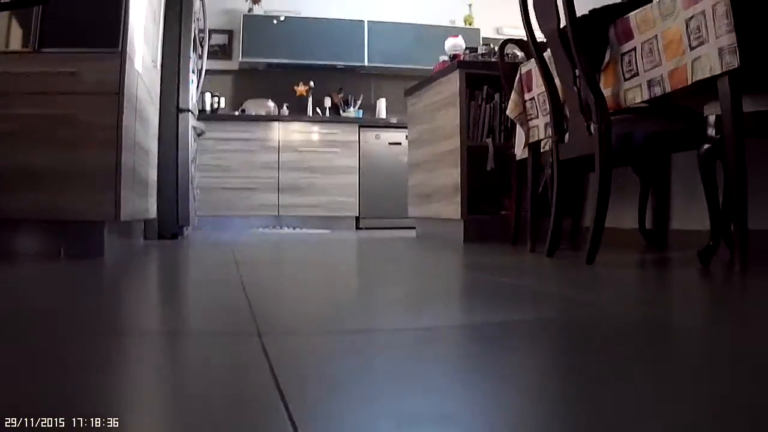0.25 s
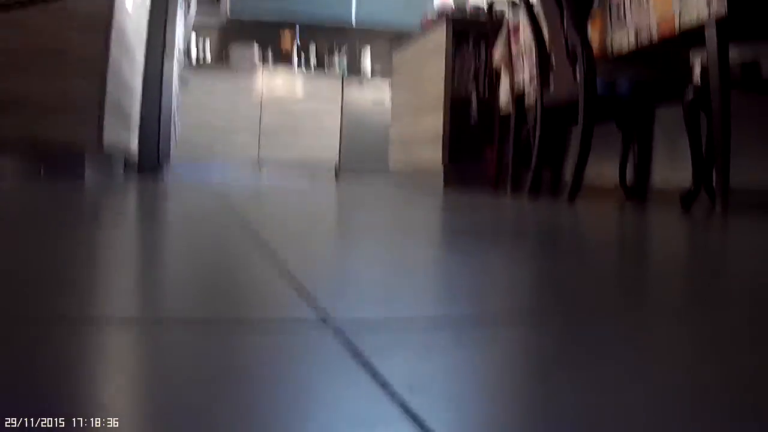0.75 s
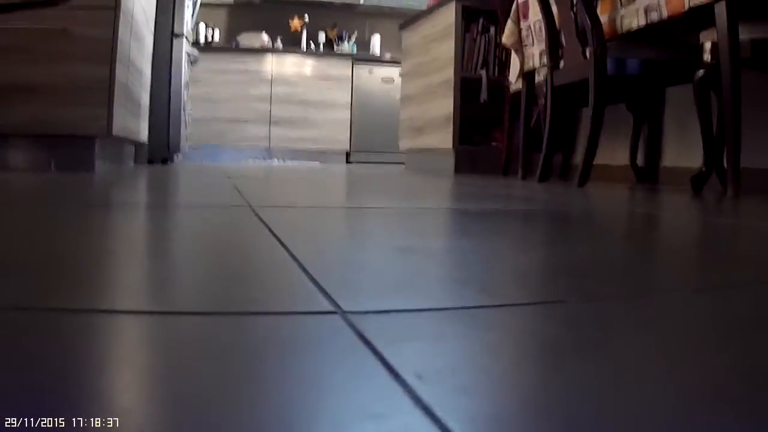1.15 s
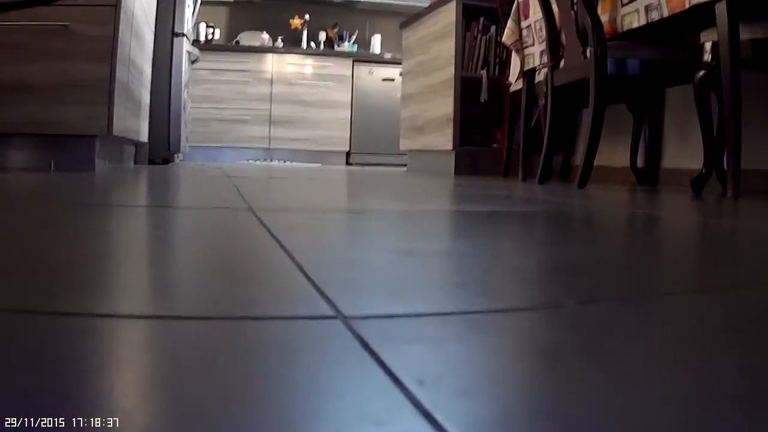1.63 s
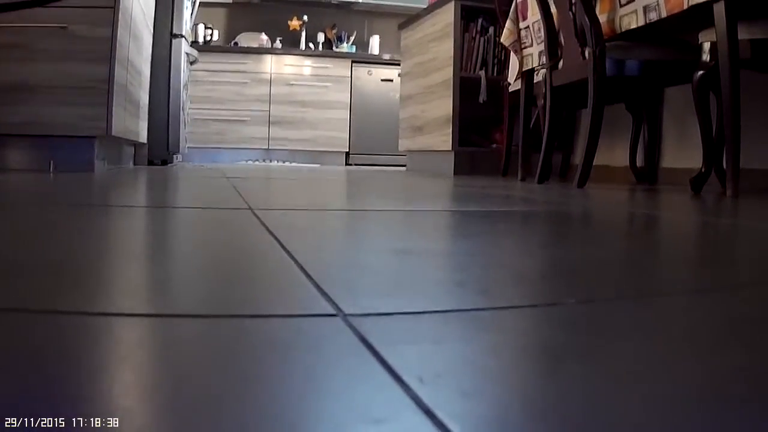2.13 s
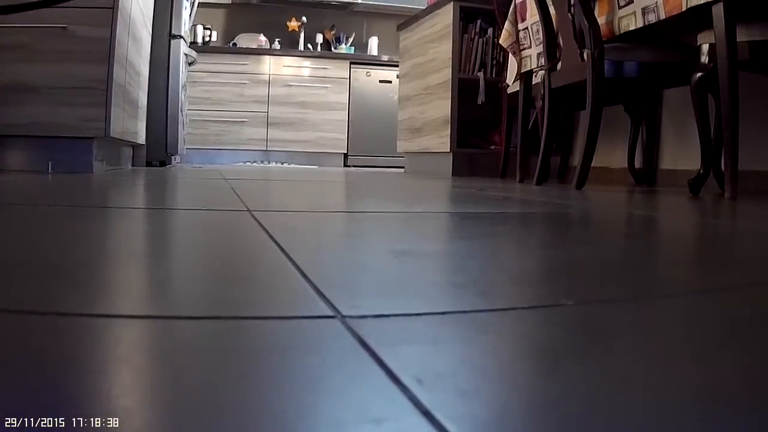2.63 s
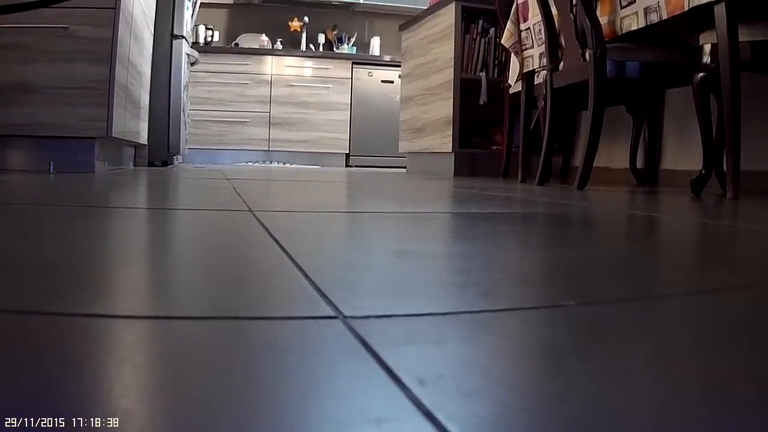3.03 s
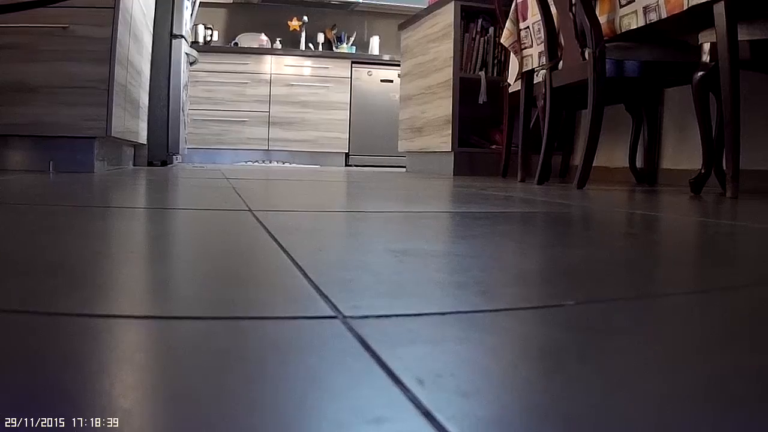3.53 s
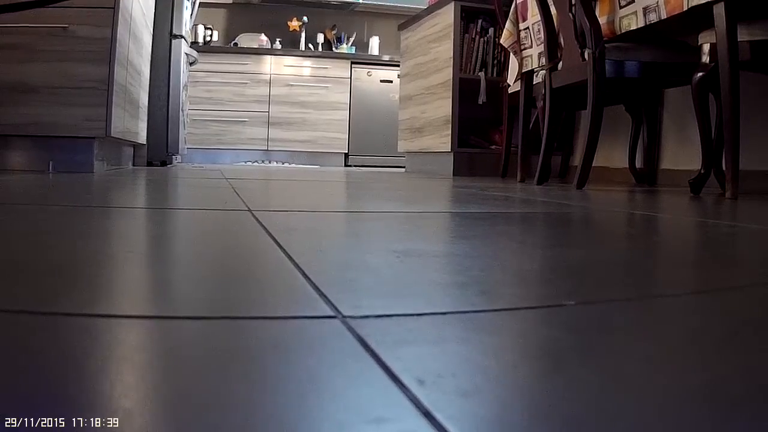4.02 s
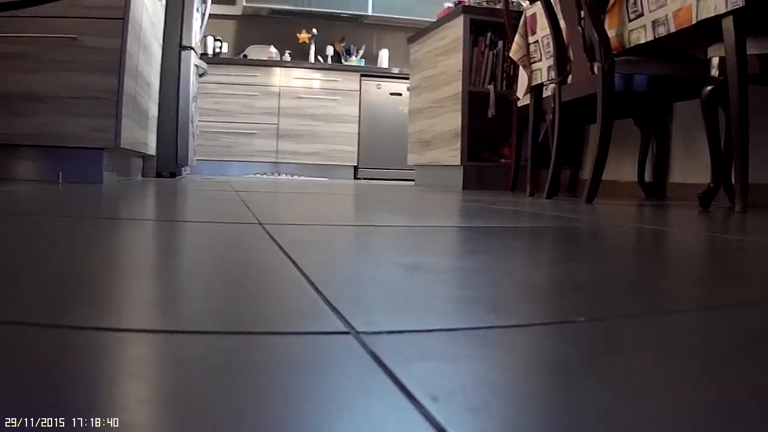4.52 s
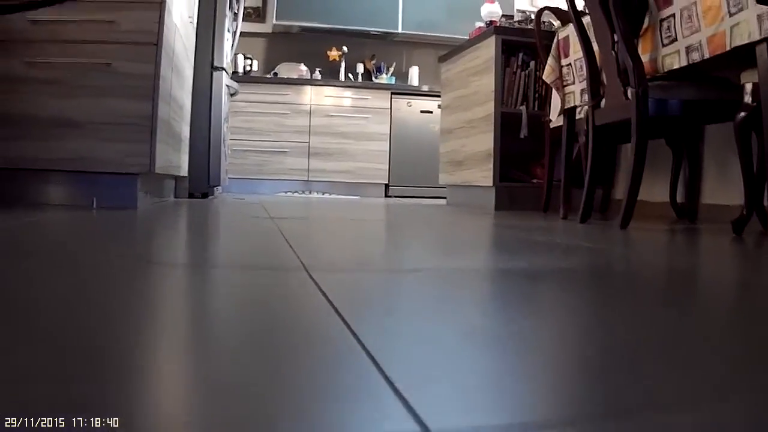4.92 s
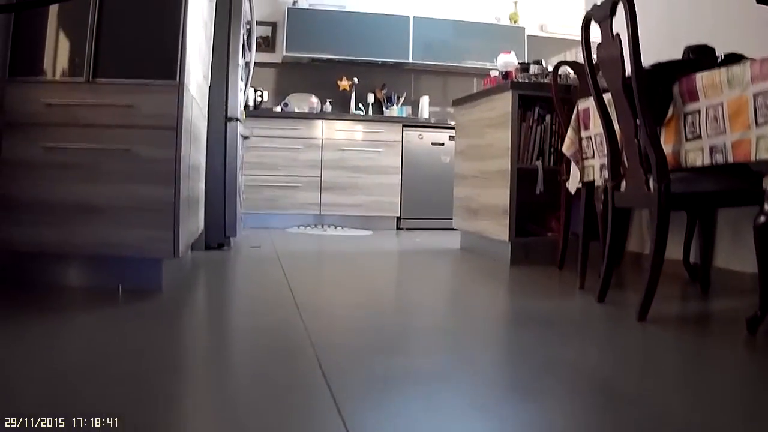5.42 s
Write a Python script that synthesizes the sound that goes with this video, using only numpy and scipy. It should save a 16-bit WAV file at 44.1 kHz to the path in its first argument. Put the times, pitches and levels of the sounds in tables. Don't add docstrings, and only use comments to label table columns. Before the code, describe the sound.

Plastic legs knock on tile, a long quiet follows with one distant snap, then four tiny motors whistle, rev up and scream.

```python
import sys
import numpy as np
from scipy import signal
from scipy.fft import rfft, irfft, next_fast_len
from scipy.io import wavfile
from scipy.ndimage import uniform_filter1d

SR = 44100
rng = np.random.default_rng(int(sys.argv[2]) if len(sys.argv) > 2 else 0)


def ratio(d):
    e = np.asarray(d, float) / 20
    return 10 ** e


def wav_record(signal):
    frames = np.transpose(np.atleast_2d(signal))
    bounded = np.clip(frames, -1, 1)
    quanta = np.round(bounded * 32767).astype(np.int16)
    wavfile.write(sys.argv[1], SR, quanta)


N = 249606

POWER_ON_S = 3.882
GEAR_RATIO = 5.42

# (time [s], shaft speed [Hz])
SHAFT_SPEEDS = [
    [(3.88, 10), (4.0, 131), (4.25, 332), (4.45, 461), (4.62, 528), (4.85, 555), (5.2, 564.5),
     (5.47, 537.5), (5.66, 540.7)],
    [(3.88, 10), (4.0, 155), (4.3, 374), (4.58, 522), (4.73, 564), (4.88, 571.5), (5.03, 561.5),
     (5.26, 567.5), (5.46, 556.5)],
    [(3.88, 12), (4.0, 185), (4.12, 286), (4.4, 456), (4.65, 576), (4.85, 645), (5.02, 669), (5.22, 669),
     (5.66, 633)],
    [(3.88, 12), (4.0, 176), (4.3, 395), (4.6, 571), (4.8, 631), (4.95, 661), (5.1, 664), (5.29, 662),
     (5.66, 628)],
]
# (unbalance [dB], commutator [dB], its octave [dB], gear mesh [dB])
STRONG_ORDERS = [(-33, -19.5, -20.5, -36.5), (-40.5, -19, -19.5, -26), (-26, -24.5, -26, -25.5),
                 (-27.5, -22.5, -23.5, -28.5)]
WEAK_MULTIPLES = [4, 7, 8, 10, 12]
# (level of each multiple [dB], ...)
WEAK_ORDERS = [(-18, -20, -20, -30, -24), (-24, -18, -20, -11, -26), (-18, -17, -11, -15, -24),
               (-22, -22, -17, -24, -24)]
ROTOR_UNBALANCE = [-33.5, -57, -36, -53]
# (frequency [Hz], width [Hz], level [dB])
FRAME_MODES = [(740, 150, 7), (1780, 680, 9.5), (3990, 720, 1.5), (4960, 680, 1.5), (6550, 1300, -6.5),
               (10200, 4300, -29)]
# (frequency [Hz], level [dB])
ARM_RESPONSES = [
    [(400, -23.5), (780, -1.5), (1030, -10), (1350, -3), (1700, -0.5), (2000, -0.5)],
    [(1000, -16.5), (1400, -7.5), (1720, 2.5), (2200, -9), (2900, -11.5), (3400, -25.5), (4000, -6)],
    [(1300, -14), (1800, 6), (2300, 7.5), (2900, -12), (3700, -11), (4300, 0), (5100, 2.5), (6000, -6.5)],
]
# (time [s], level [dB])
WHISTLE_LEVEL = [(3.882, -58), (3.885, -34.5), (3.9, -33.5), (4, -22), (4.3, -27), (4.48, -26.5),
                 (4.7, -38.5), (5.3, -40.5), (5.66, -41)]
WHISTLE_OVERTONES = [-2.5, -13.5, -22]
# (time [s], level [dB])
BRUSH_STRAIN = [(3.88, -53), (3.914, -21.5), (3.968, -7.5), (4.044, -1), (4.19, -1), (4.34, -0.5),
                (4.52, -1.5), (4.74, -5), (5.66, -5.5)]
# (frequency [Hz], density [dB per Hz])
DRUM_SPECTRUM = [(300, -55), (500, -9.5), (780, 2), (1100, -5.5), (1450, 2), (1850, 6.5), (2300, -3.5),
                 (3000, -77)]
# (frequency [Hz], density [dB per Hz])
RATTLE_SPECTRUM = [(1500, -24), (2300, -5.5), (3000, -5.5), (4000, 0), (4600, -6.5), (5200, 0), (6000, -4),
                   (7000, -3), (9000, -29)]
# (frequency [Hz], density [dB per Hz])
BRUSH_HISS_SPECTRUM = [(4500, -20.5), (6300, -16), (7800, 1.5), (9100, -6.5), (10200, 1), (11000, -5),
                       (11800, -13.5), (14000, -19.5), (15300, -25), (15800, -54)]
# (frequency [Hz], density [dB per Hz])
WASH_SPECTRUM = [(10, -5), (40, -1), (75, -6), (105, 9), (140, -8), (250, -7), (400, -11), (700, -16)]
# (time [s], body level [dB], snap level [dB], body pitch [Hz])
CONTACTS = [(0.5857, -50, -20, 1660), (0.6794, -19.5, -5.5, 1250), (0.6884, -18, -4.5, 1350),
            (0.7479, -19, -4, 1460), (0.7969, -23, -6, 910), (0.814, -42, -14, 1410),
            (0.829, -41, -3, 1800), (0.845, -46, -3, 1800), (.9894, -50, 0, 2290), (1.8668, -50, -22, 1520),
            (2.7978, -53.5, -6, 1230), (3.8221, -43, -2, 1070), (3.8814, -34.5, -4, 1900)]
# (time [s], level [dB])
SETTLING_TICKS = [(0.959, -59), (1.099, -63), (1.117, -64), (1.9064, -59.5), (1.932, -57), (2.015, -58.5),
                  (2.909, -64), (2.945, -61), (3.5094, -65), (3.5862, -62), (3.636, -59.5)]
# (time [s], level [dB], pitch [Hz], t60 [s])
SOFT_BUMPS = [
    (1.866, -50.5, 520, 0.14),
    (1.961, -53.5, 320, 0.2),
    (2.797, -54, 620, .08),
    (3.886, -49, 103, 0.78),
]
# (time [s], level [dB], pitch [Hz], t60 [s], stopped at [s])
SHELL_RINGS = [
    (.688, -17, 652, 0.26, 0.79),
    (.757, -20, 615, 0.069, 1),
    (.803, -27, 640, 0.14, .9),
    (.92, -45, 653, 0.17, 0.99),
]
# (time [s], level [dB], length [s])
LEG_SLIDES = [
    (0.683, -40, 0.021),
    (0.745, -37.5, 0.032),
    (0.8, -40.5, 0.037),
    (0.895, -57.5, 0.14),
]
# (frequency [Hz], density [dB per Hz])
FRICTION_SPECTRUM = [(60, -38), (150, -11), (600, -7), (1000, -8.5), (1800, -9), (2600, -23), (6200, -23.5),
                     (10000, -26.5), (15000, -40)]
# time [s], direct level [dB], reverberation level [dB]
DISTANT_KNOCK = (3.083, -32, -45)
# (frequency [Hz], density [dB per Hz])
DISTANT_SPECTRUM = [(200, -45), (450, -18), (700, -7), (920, -2), (1200, -6), (1520, 0), (1900, -12),
                    (2600, -17), (3600, -14), (5200, -19), (8000, -27), (13000, -45)]
# (frequency [Hz], t60 [s])
KITCHEN_T60 = [(500, .45), (1500, .6), (4000, .5), (10000, .4)]
# (frequency [Hz], density [dB per Hz])
MURMUR_SPECTRUM = [(60, -12.5), (110, -1), (190, 2.5), (350, -4.5), (600, -7), (850, -11), (1250, -6),
                   (1750, -10.5), (2100, -18), (3000, -31), (5000, -61)]
# (time [s], level [dB])
MURMUR_SWELL = [(0, 2), (.85, 1.5), (1.1, 4), (1.6, 0.5), (2, 4), (2.5, 0), (2.95, 1.5), (3.55, -4),
                (3.87, 3.5)]
# (frequency [Hz], density [dB per Hz])
SELF_NOISE_SPECTRUM = [(800, 6.5), (2500, -4), (4000, 0), (6000, -4), (8000, -2.5), (10000, -2.5),
                       (13000, -5.5), (15500, -7)]
# (frequency [Hz], density [dB per Hz])
RUMBLE_SPECTRUM = [(6, -20), (12, -18), (17, -4), (21, 0), (26, -7), (32, -19), (40, -24), (60, -20),
                   (110, -28), (200, -60), (400, -120)]
# (time [s], level [dB])
RUMBLE_LEVEL = [(0, -60), (.6, -62), (.85, -52), (1.2, -56), (1.85, -56), (2.3, -63), (2.7, -57),
                (3.87, -63.5)]


def unit(x):
    return x / np.sqrt(np.mean(x ** 2) + 1e-20)


def curves(rows):
    s, *cols = np.transpose(rows)
    return [np.interp(np.arange(N) / SR, s, c) for c in cols]


def smooth_curves(rows):
    s, *cols = np.transpose(rows)
    place = np.interp(np.arange(N) / SR, s, np.arange(len(s)))
    i = np.minimum(place.astype(int), len(s) - 2)
    u, step = place - i, np.diff(s)[i]

    def arc(v, slope):
        blend = v[i] + u * u * (3 - 2 * u) * (v[i + 1] - v[i])
        return blend + step * u * (1 - u) * ((1 - u) * slope[i] - u * slope[i + 1])

    return [arc(c, np.gradient(c, s)) for c in cols]


def along(points, hz):
    f, v = np.transpose(points)
    return np.interp(np.log(hz + 1), np.log(f + 1), v)


def wobble(rate):
    knots = np.arange(int(N * rate / SR) + 2)
    return np.interp(np.arange(N) * rate / SR, knots, rng.standard_normal(len(knots)))


def coloured(x, spectrum):
    m = next_fast_len(len(x) + 8192)
    closed = list(spectrum) + [(spectrum[-1][0] * 3, -100)]
    gain = ratio(along(closed, np.fft.rfftfreq(m, 1 / SR)))
    return unit(irfft(rfft(x, m) * gain, m)[:len(x)])


def noise(spectrum, length=N):
    return coloured(rng.standard_normal(length), spectrum)


def drone():
    t = np.arange(N) / SR
    speeds = [smooth_curves(rows)[0] for rows in SHAFT_SPEEDS]
    cancel_db = -22 * np.exp(-((t - 5.11) / 0.046) ** 2)
    merged = (1 + np.tanh((t - 4.86) / 0.023)) / 2
    masked_db = [cancel_db / 2, cancel_db, 0, -38 * merged]
    mesh_masked_db = [0, 0, -24 * merged, 0]
    tones, commutation = zip(*map(motor, speeds, STRONG_ORDERS, masked_db, mesh_masked_db,
                                  WEAK_ORDERS, ROTOR_UNBALANCE))
    speed = sum(speeds) / sum(speeds).max()
    running = sum(tones) + whistle(commutation) + brush_noise(commutation, speed) + rotor_wash(speed)
    return running * (t > POWER_ON_S)


def motor(hz, strong, masked_db, mesh_masked_db, weak, rotor_db):
    shaft_db = strong[0] + masked_db + 17 * 10 * np.log10(np.clip(hz / 446, 0, 1))
    effort = np.clip(hz / 190, 0, 1) ** 4.4
    comm, twice, mesh = (effort * ratio(db + along(arm, k * hz))
                         for k, db, arm in zip([3, 6, 9], strong[1:], ARM_RESPONSES))
    load = np.clip(uniform_filter1d(np.gradient(hz) * SR, SR // 10) / 800, 0, 1)
    flutter_hz = hz * .0011 * wobble(50) + 4.5 * load * wobble(120)
    turn = 2 * np.pi * (np.cumsum(hz + flutter_hz) / SR + rng.random())
    rotor = turn / GEAR_RATIO

    def tone(order):
        level = ratio(0.9 * wobble(30) + 1.4 * wobble(9))
        return 2 ** .5 * level * np.sin(order * turn + 2 * np.pi * rng.random())

    def wag(depth):
        return 1 + depth * np.cos(rotor)

    sound = ratio(shaft_db) * wag(0.25) * tone(1)
    sound += mesh * ratio(mesh_masked_db) * wag(0.35) * tone(9)
    sound += ratio(shaft_db - 2.0) * load * tone(1 + 1 / GEAR_RATIO)
    sound += wag(0.19) * ratio(masked_db) * (comm * tone(3) + twice * tone(6))
    sound += effort * sum(ratio(db - 20.0) * frame(k * hz) * tone(k) for k, db in zip(WEAK_MULTIPLES, weak))
    rotor_gain = ratio(rotor_db + 3.8 * wobble(18)) * np.clip(hz / (0.8 * hz.max()), 0, 1) ** 4
    sound += rotor_gain * (np.sin(rotor) + 0.19 * np.sin(2 * rotor))
    return sound, 3 * turn


def frame(hz):
    return sum(ratio(db) / (1 + (2 * (hz - c) / w) ** 2) for c, w, db in FRAME_MODES)


def whistle(commutation):
    t = np.arange(N) / SR
    whistle_db, = curves(WHISTLE_LEVEL)
    tops_db = -26 + (-5.5 + 26) * np.exp(-((t - POWER_ON_S) / 0.17) ** 2)
    broken = 1 + sum(.2 * np.cos(c) + .2 * np.cos(2 * c) for c in commutation)

    def partial(k):
        switch_hz = 3666.7
        phase = 2 * np.pi * k * switch_hz * t + .35 * k * wobble(150)
        return ratio(1.5 * wobble(60)) * np.sin(phase)

    tops = sum(ratio(db + tops_db) * partial(k) for k, db in enumerate(WHISTLE_OVERTONES, 2))
    return 2 ** .5 * ratio(whistle_db) * broken * (partial(1) + tops)


def brush_noise(commutation, speed):
    strain_db, = curves(BRUSH_STRAIN)
    stutter_db = 2.5 * (1 - speed) ** 2 * wobble(110)

    def sparks():
        pulse = 1 + 0.16 * sum(np.cos(c) for c in commutation)
        return rng.standard_normal(N) * pulse * ratio(0.88 * wobble(150) + stutter_db)

    drum_db = -21.5 + 0.72 * strain_db + 0.77 * wobble(12)
    rattle_db = -16.5 + 1.61 * strain_db
    hiss_db = -22 + 1.57 * strain_db + 7.5 * (speed - .5)
    drum = ratio(drum_db) * coloured(sparks(), DRUM_SPECTRUM)
    rattle = ratio(rattle_db) * coloured(sparks(), RATTLE_SPECTRUM)
    return drum + rattle + ratio(hiss_db) * coloured(sparks(), BRUSH_HISS_SPECTRUM)


def rotor_wash(speed):
    lift_s, climb_db_per_s, aloft_db = 4.92, -33, -21
    climb_db = np.clip(climb_db_per_s * (np.arange(N) / SR - lift_s), aloft_db, 0)
    wash_db = -29 + 1.5 * 20 * np.log10(speed) + climb_db
    return ratio(wash_db + 1.8 * wobble(4.9)) * noise(WASH_SPECTRUM)


def burst(spectrum, t60):
    t = np.arange(SR // 4) / SR
    return noise(spectrum, len(t)) * ratio(-60 * t / t60)


def knocks():
    out, t = np.zeros(N + SR), np.arange(SR // 4) / SR
    snap_spectrum = [(1500, -31), (3000, 0.5), (6500, 5.0), (8500, -8), (10500, -7.5), (12500, -17),
                     (16000, -40)]
    ticks = [(s, db, 6.5, 1430) for s, db in SETTLING_TICKS]
    for s, db, snap_db, hz in list(CONTACTS) + ticks:
        body_spectrum = [(hz / 4, -25), (hz * 0.59, -9), (hz, 0), (hz * 1.49, -8), (hz * 2.57, -30)]
        body = burst(body_spectrum, 0.053)
        snap = ratio(snap_db) * burst(snap_spectrum, 0.026)
        thud = ratio(-16.5 - 60 * t / 0.11) * np.sin(2 * np.pi * 130 * t)
        out[round(s * SR):][:len(t)] += ratio(db - 4.5) * (body + snap + thud)
    for s, db, hz, t60 in SOFT_BUMPS:
        bump_spectrum = [(hz / 3, -25), (hz * .75, -6), (hz, 0), (hz * 1.3, -10), (hz * 2.5, -35)]
        out[round(s * SR):][:len(t)] += ratio(db) * burst(bump_spectrum, t60)
    return out[:N]


def shell_ringing():
    out, t = np.zeros(N + SR), np.arange(SR // 4) / SR
    for s, db, hz, t60, stop in SHELL_RINGS:
        pair = np.sin(2 * np.pi * hz * t) + 0.19 * np.sin(2 * np.pi * (hz + 22) * t - 2)
        onset = 1 - np.exp(-t / 0.0064)
        damped = np.clip((stop - s - t) / 0.0036, 0, 1)
        out[round(s * SR):][:len(t)] += ratio(db - 60 * t / t60) * onset * pair * damped
    return out[:N]


def leg_slides():
    t = np.arange(N) / SR
    sag_db_per_s, release_db_per_s = -130, -450
    sliding = np.zeros(N)
    for s, db, length in LEG_SLIDES:
        sag_db = sag_db_per_s * np.clip(t - s, 0, length)
        release_db = release_db_per_s * np.maximum(t - s - length, 0)
        sliding += (t > s) * ratio(db + sag_db + release_db)
    return sliding * ratio(2.7 * wobble(200)) * noise(FRICTION_SPECTRUM)


def far_knock():
    s, direct_db, tail_db = DISTANT_KNOCK
    hz, t, z = signal.stft(noise(DISTANT_SPECTRUM, SR), SR, nperseg=256)
    decay = ratio(-60 * t / along(KITCHEN_T60, hz)[:, None])
    tail = signal.istft(z * decay, SR, nperseg=256)[1][:SR]
    t = np.arange(SR) / SR
    snap = ratio(direct_db - 60 * t / .014) * noise(DISTANT_SPECTRUM, SR)
    out = np.zeros(N)
    out[round(s * SR):][:SR] = snap + ratio(tail_db) * (1 - np.exp(-t / 0.0034)) * tail
    return out


def quiet():
    swell_db, = curves(MURMUR_SWELL)
    rumble_db, = curves(RUMBLE_LEVEL)
    murmur = ratio(-65.5 + swell_db + wobble(2.85)) * noise(MURMUR_SPECTRUM)
    self_noise = ratio(-67) * noise(SELF_NOISE_SPECTRUM)
    rumble = ratio(rumble_db + 0.9 * wobble(10.4)) * noise(RUMBLE_SPECTRUM)
    return murmur + self_noise + rumble


def scene():
    mix = drone() + knocks() + shell_ringing() + leg_slides() + far_knock() + quiet()
    return np.tile(mix, (2, 1))


def top_cut(x):
    return signal.sosfilt(signal.butter(12, 15660, fs=SR, output="sos"), x)


def record(dry):
    top, hardness = .8, 4
    mix = dry / (1 + np.abs(dry / top) ** hardness) ** (1 / hardness)
    return top_cut(mix)


dry = scene()
out = record(dry)
wav_record(out)
```